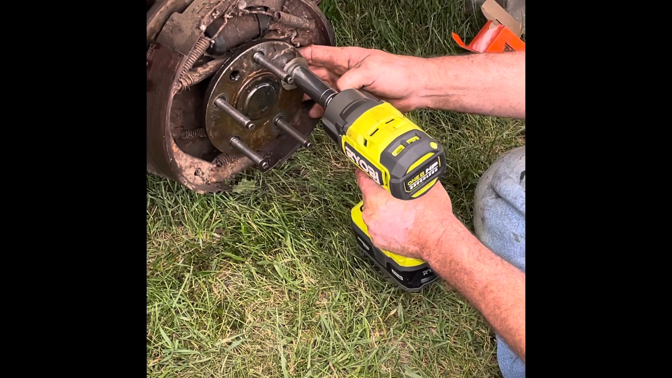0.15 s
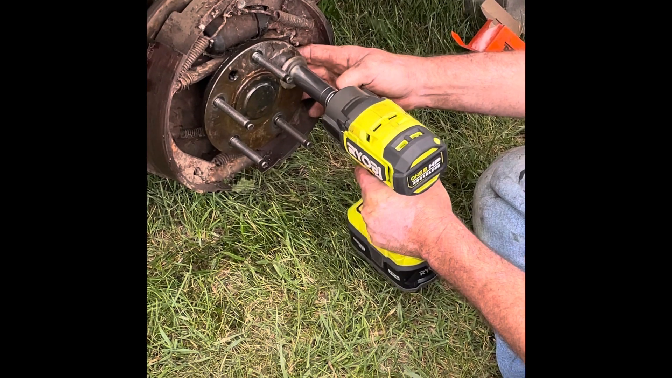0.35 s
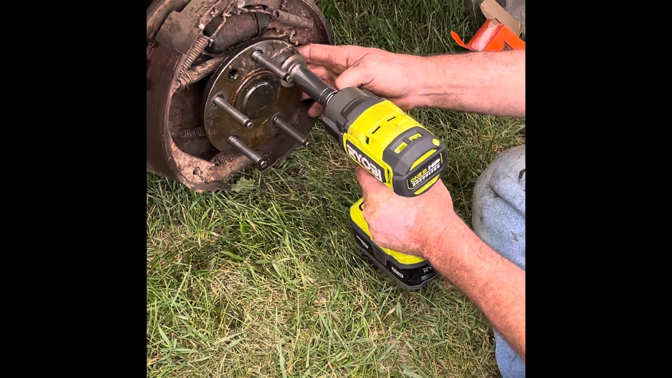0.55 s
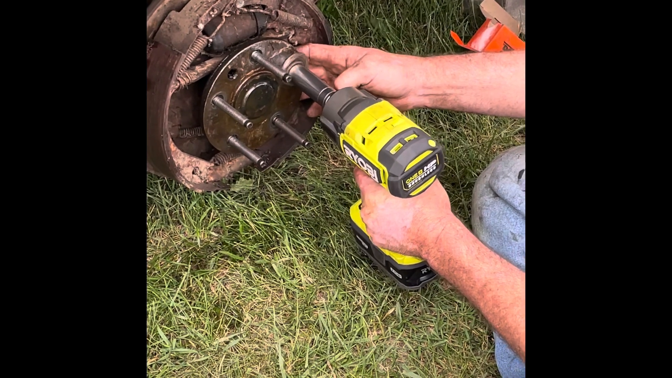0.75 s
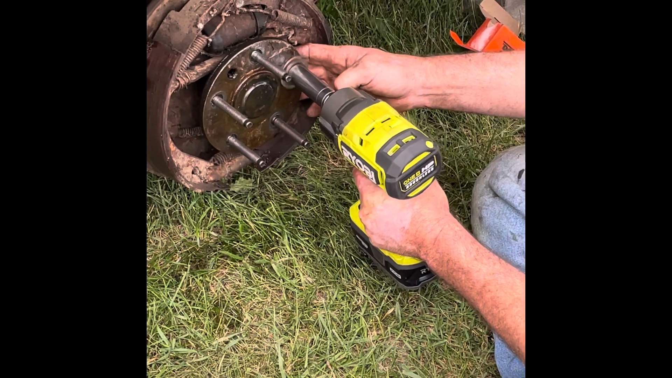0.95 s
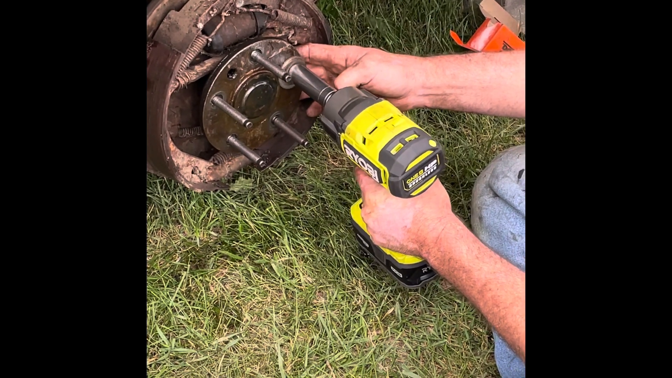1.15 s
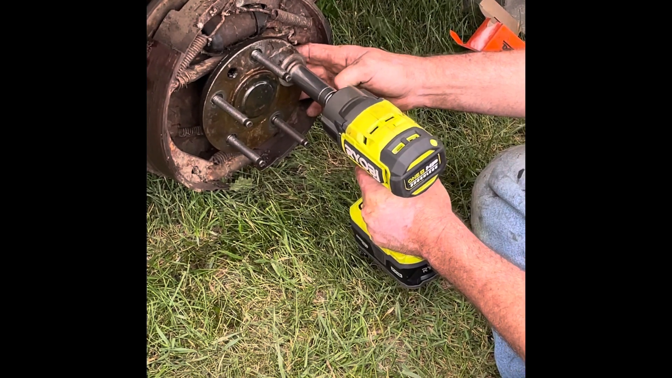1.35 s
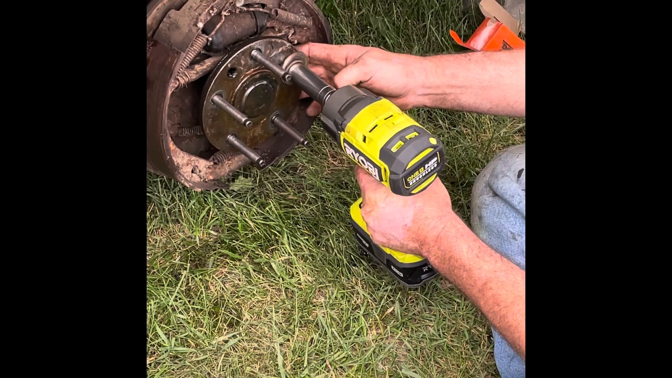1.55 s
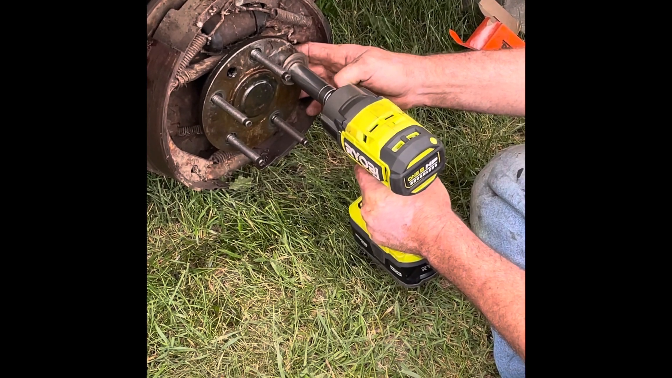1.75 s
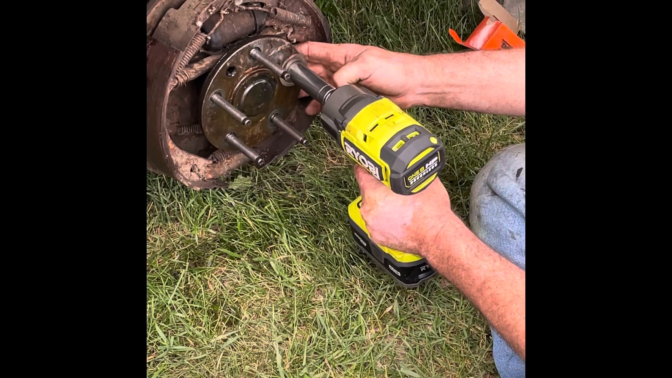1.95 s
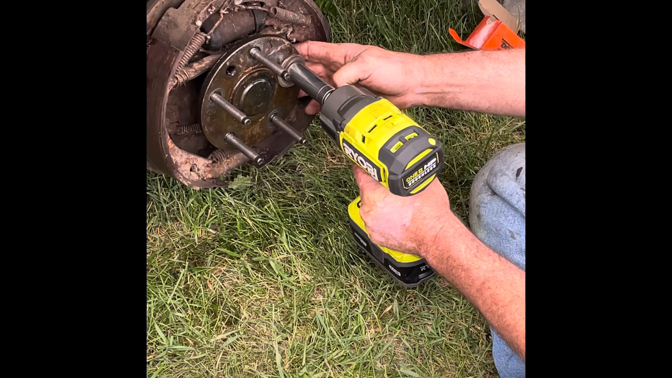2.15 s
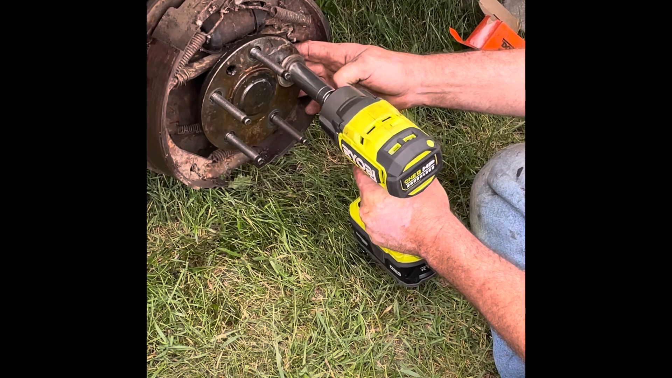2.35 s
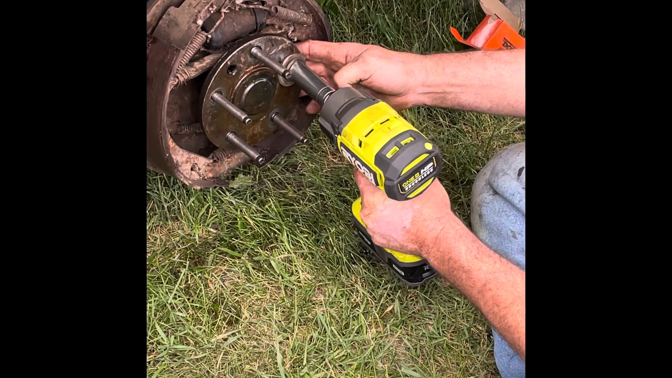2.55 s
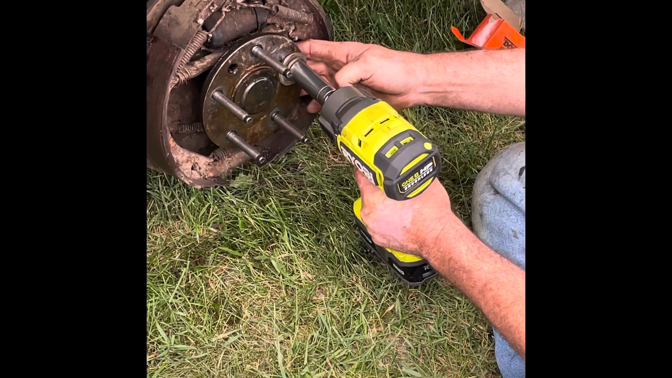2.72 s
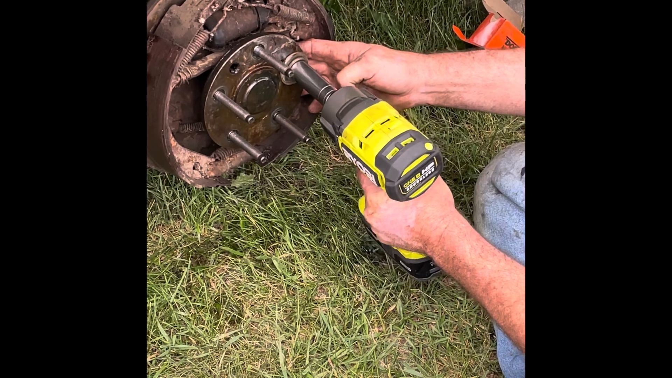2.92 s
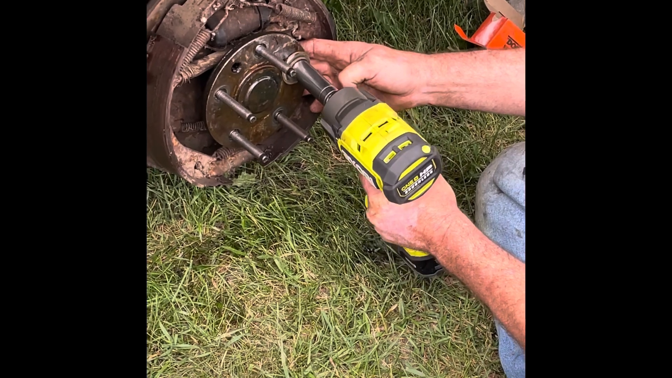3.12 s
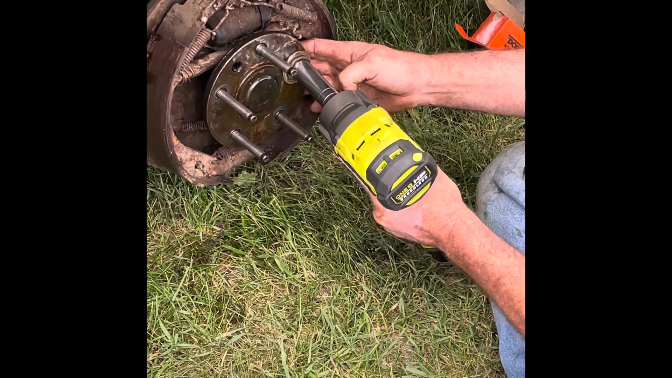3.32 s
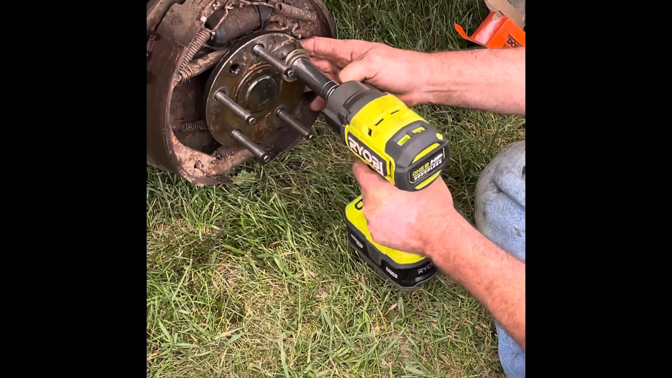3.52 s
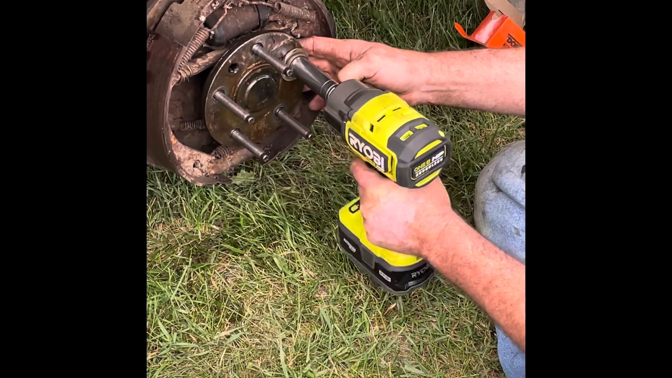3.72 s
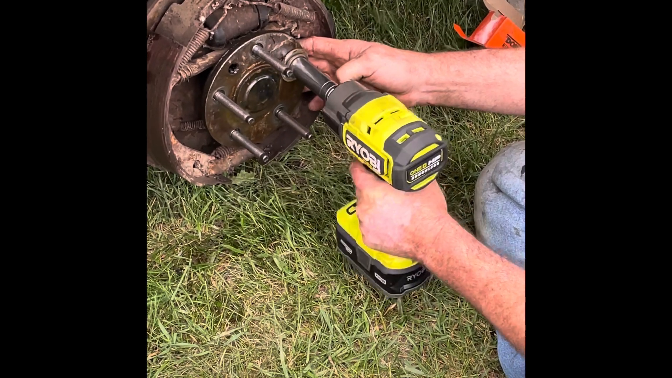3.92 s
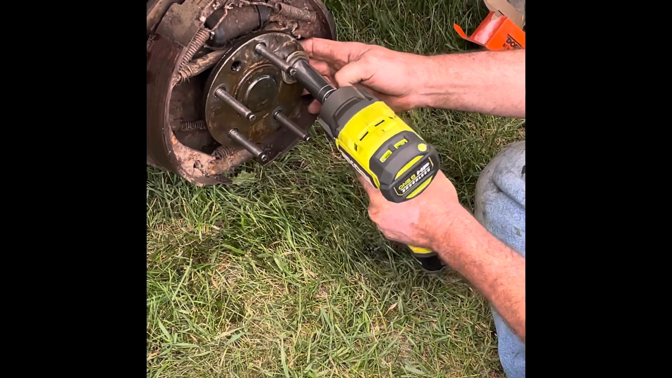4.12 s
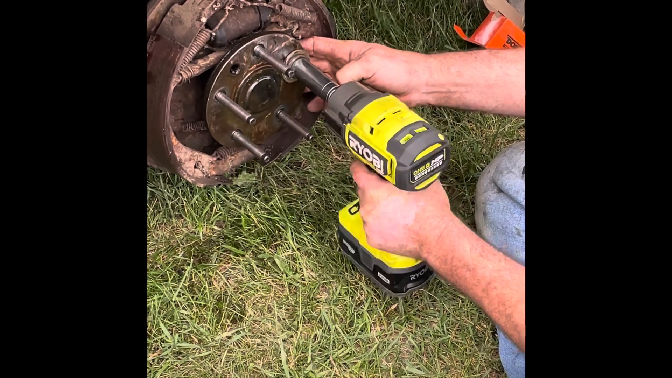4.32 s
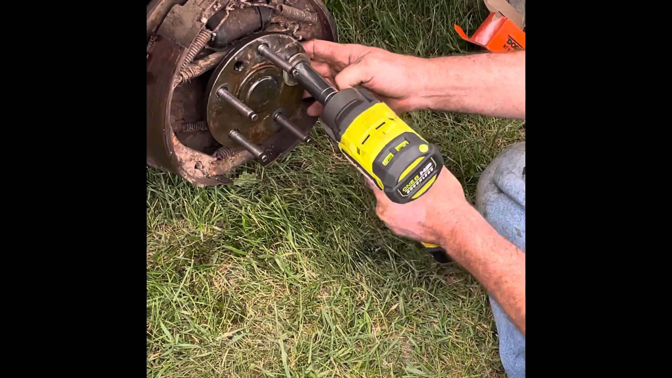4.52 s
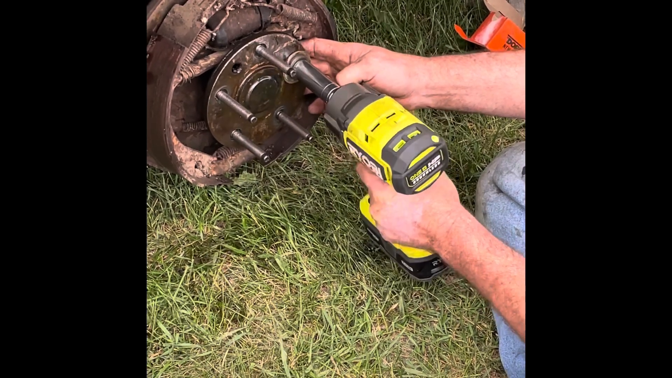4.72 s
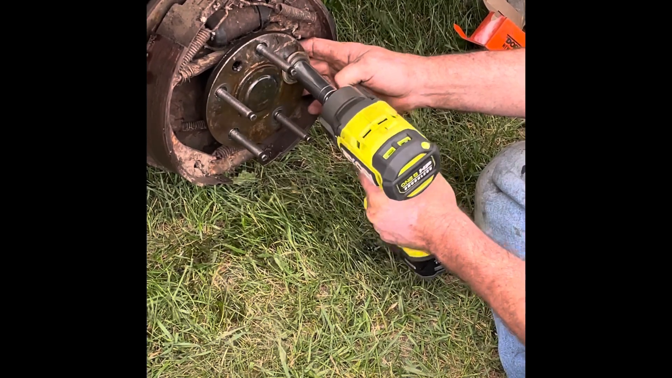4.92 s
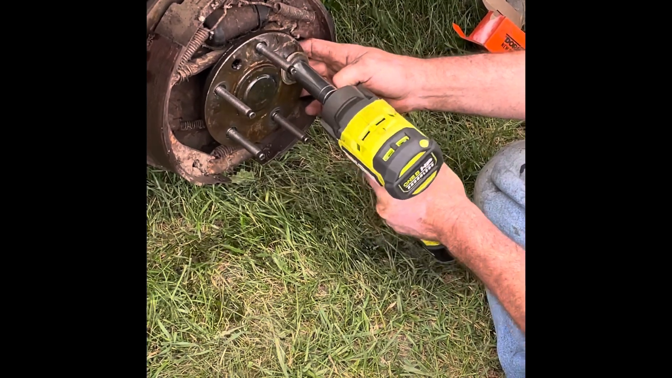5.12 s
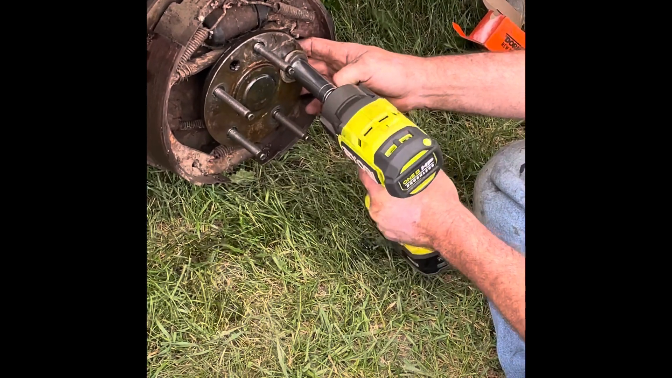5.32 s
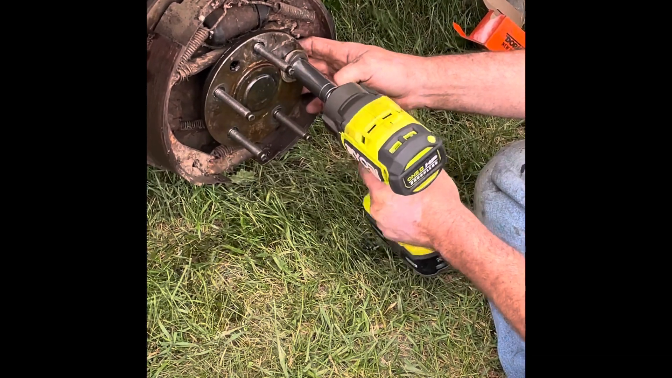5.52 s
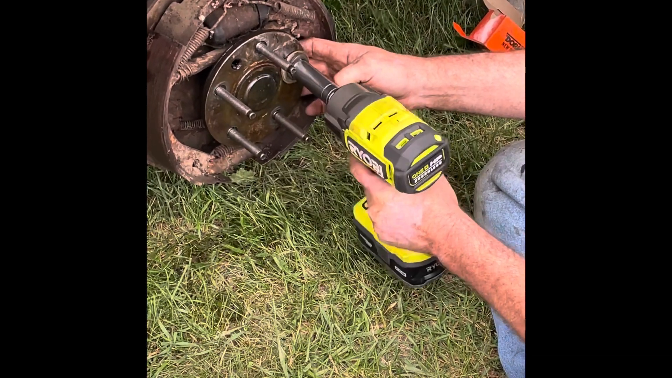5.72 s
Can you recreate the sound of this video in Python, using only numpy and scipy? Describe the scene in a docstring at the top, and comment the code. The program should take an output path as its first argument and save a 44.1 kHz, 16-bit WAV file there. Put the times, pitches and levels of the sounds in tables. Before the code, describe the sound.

Very close outdoors, a battery impact wrench is already hammering a nut on a wheel stud: a harsh buzzing clatter of about sixty steel blows a second, with ringing metal and gear rattle. It stops after three seconds. Four short bursts follow, separated by brief gaps with ticking socket and low wind buffeting; the last stumbles weakly. Dry open air, stereo microphone catching wind.

```python
"""A cordless impact wrench hammers a lug nut onto a wheel stud outdoors: one long burst, then four short ones.
Some sixty blows a second clash as decaying noise bands and ring the steel of stud, socket, anvil, nut and hub.
Gears rattle as flickering noise, the housing drones, axle and drum thud as low resonators; loose ticks come
before and after bursts. Wind rumbles, flutters and pops at two microphone ports over a faint far hiss."""
import sys
import numpy as np
from scipy import signal
from scipy.fft import rfft, irfft, next_fast_len
from scipy.io import wavfile

SR = 44100
rng = np.random.default_rng(int(sys.argv[2]) if len(sys.argv) > 2 else 0)


def master_out(mix):
    """Clip the mix to full scale and print it as 16-bit PCM to the path in sys.argv[1]."""
    frames = np.transpose(np.atleast_2d(mix))
    ceiling = np.clip(frames, -1, 1)
    pcm = np.round(ceiling * 32767).astype(np.int16)
    wavfile.write(sys.argv[1], SR, pcm)


N = 254368


def amp(db):
    """Decibels to amplitude."""
    return 10 ** (np.asarray(db) / 20)


def rms_one(x):
    """Scale to an rms of 1."""
    return x / np.sqrt(np.mean(x ** 2) + 1e-20)


def in_time(rows):
    """Columns of a curve table, interpolated to one value per sample."""
    time_s, *columns = np.transpose(rows)
    return [np.interp(np.arange(N) / SR, time_s, column) for column in columns]


def at_hz(points, hz):
    """Read a (frequency, value) curve, linear in log frequency."""
    points = np.array(points)
    return np.interp(np.log(hz), np.log(points[:, 0]), points[:, 1])


def samples(events):
    """Sample index of each event row."""
    return (np.array(events)[:, 0] * SR).astype(int)


def latest(at):
    """Index of the latest event at every sample; the first one before any."""
    return np.maximum(np.searchsorted(at, np.arange(N), "right") - 1, 0)


def drift(rate):
    """Slow random curve of spread about 1, with some 2 * rate knots a second."""
    knots = int(N / SR * rate * 2) + 2
    return np.interp(np.arange(N), np.linspace(0, N, knots), rng.standard_normal(knots))


def clicks(events, gains):
    """One-sample click of the given size at each event."""
    out = np.full(N, 1e-18)   # inaudible floor
    out[samples(events)] = gains
    return out


def fade(x, t60):
    """Each click jumps up and decays by 60 dB in t60 seconds."""
    return signal.lfilter([1], [1, -amp(-60 / (t60 * SR))], x)


def ring(x, hz, t60):
    """Two-pole resonator: a unit click starts a decaying sine of height about 1."""
    r, w = amp(-60 / (t60 * SR)), 2 * np.pi * hz / SR
    return signal.lfilter([0, np.sin(w)], [1, -2 * r * np.cos(w), r * r], x)


def glide(x, hz, t60):
    """Resonator whose pitch may move while it rings."""
    turn = np.exp(2j * np.pi * np.cumsum(hz * np.ones(N)) / SR)
    return np.imag(turn * fade(x / turn, t60))


def bandpass(x, low_hz, high_hz, order):
    """Butterworth band-pass."""
    return signal.sosfilt(signal.butter(order, [low_hz, high_hz], "band", fs=SR, output="sos"), x)


def bands(white):
    """Yield third-octave centre and noise, alternating two white noises so neighbours are unrelated."""
    edges_hz = 600 * 2 ** np.arange(0, 5.1, 1 / 3)
    for k, (low, high) in enumerate(zip(edges_hz, edges_hz[1:])):
        yield np.sqrt(low * high), bandpass(white[k % 2], low, high, order=2)


def hiss(spectrum, white, patchy_db, rate):
    """Band noise of rms 1 whose bands flicker partly together."""
    together = drift(rate)
    out = 0
    for hz, noise in bands(white):
        flicker_db = patchy_db * (together + 1.2 * drift(rate))
        out = out + amp(at_hz(spectrum, hz) + flicker_db) * noise
    return rms_one(out)


def hammer_blows():
    """Rows (s, dB): long burst at its pace, short bursts gathering speed, and blows out of step."""
    # pace of the long burst: (blows struck so far, time [s])
    pace = [(0, -.0027), (8, .128), (26, .4136), (44, .7044), (54, .8678), (78, 1.2501), (106, 1.693),
            (170, 2.6984), (176, 2.7918), (182, 2.8891), (186, 2.9514), (200, 3.1734)]
    # short bursts: (first blow [s], number of blows)
    bursts = [(3.924, 13), (4.3943, 12), (4.8959, 14)]
    # regular blows, two dogs in turn: (time [s], mean level of first 4 ms [dB], first dog above mean [dB])
    force = [(0, -16, 0), (.22, -17.5, -3), (.32, -18, 2), (.38, -15.5, 0), (.51, -21, 0), (.58, -18, 1.5),
             (.8, -17, -2), (1.03, -18.5, -1.5), (1.12, -16, -.5), (1.25, -19, 0), (1.54, -18.5, -1),
             (1.62, -16.5, -1.5), (1.76, -17.5, 1.5), (1.85, -18.5, 0), (2.16, -18.5, -1.5),
             (2.3, -19.5, 0), (2.38, -18.5, 1.5), (2.6, -17, 2.5), (2.73, -17, 1), (2.82, -20.5, 1.5),
             (3.01, -20, -3), (3.08, -18, -.5), (3.17, -18, -2), (3.92, -13, 0), (4.03, -15.5, -.7),
             (4.12, -12.5, 0), (4.58, -13.5, .5), (4.89, -19, 0), (4.92, -13, 0), (4.95, -12, 0),
             (4.98, -16.5, .5), (5.03, -15, .5), (5.08, -18, 0), (5.11, -13.5, 0)]
    # late blows as the motor slows, and the stumbling last burst: (time [s], level of first 4 ms [dB])
    strays = [(3.192, -15.5), (4.1428, -18.5), (4.6003, -18.5), (4.6185, -20.5), (5.129, -25),
              (5.3822, -22), (5.4093, -22), (5.4163, -18.5), (5.4368, -18.5), (5.4564, -25),
              (5.4742, -19.5), (5.4863, -23.5), (5.5156, -22.5), (5.5463, -22), (5.5649, -22),
              (5.5768, -21.5), (5.6107, -28), (5.6285, -25.5), (5.6479, -26)]
    start_gaps_s, gap_s = [.0213, .0183], .01597
    scatter_s, scatter_db = .0001, 1.1

    struck, struck_s = np.transpose(pace)
    times = [np.interp(np.arange(struck[-1] + 1), struck, struck_s)]
    for first_s, count in bursts:
        gaps_s = [0] + start_gaps_s + [gap_s] * (count - 3)
        times.append(first_s + np.cumsum(gaps_s))
    times = np.concatenate(times)

    luck = rng.standard_normal((len(times), 2))
    at_s, force_db, dog_db = np.transpose(force)
    level_db = np.interp(times, at_s, force_db)
    level_db = level_db + np.interp(times, at_s, dog_db) * (-1) ** np.arange(len(times))
    blow_s = np.maximum(times + scatter_s * luck[:, 0], 0)
    regular = np.transpose([blow_s, level_db + scatter_db * luck[:, 1]])
    rows = np.vstack([regular, strays])
    return rows[np.argsort(rows[:, 0])]


def habitual(blows, count):
    """White noise partly repeating at each dog's next blow, as it meets the same worn faces."""
    size, repeated, lasting = 900, .6, .9   # samples; energy share; pattern kept from turn to turn
    at = samples(blows)
    fresh = rng.standard_normal((count, len(at) + 40, size))
    # feedback two blows back: the same dog; 40 blows of run-in are dropped
    pattern = signal.lfilter([np.sqrt(1 - lasting ** 2)], [1, 0, -lasting], fresh, axis=1)[:, 40:]
    last = latest(at)
    since = np.arange(N) - at[last]
    share = repeated * ((since >= 0) & (since < size))
    chance = rng.standard_normal((count, N))
    return np.sqrt(share) * pattern[:, last, since % size] + np.sqrt(1 - share) * chance


def clash(events, white, colour_db, t60_scale, rise_s):
    """Faces meet in a spray of micro-contacts: noise leaps up and dies by band, coloured anew each time."""
    # relative noise density: (frequency [Hz], density [dB])
    clash_spectrum = [(700, -42), (950, -34), (1250, -22), (2000, -13), (3000, -2.5), (4200, -0.5),
                      (5600, -1.5), (7000, -3), (10000, -5), (13000, -11.5), (15500, -17)]
    # decay before t60_scale: (frequency [Hz], t60 [s])
    clash_decay = [(1000, 0.11), (2500, 0.026), (6000, 0.0082), (14000, 0.019)]
    out, luck = 0, rng.standard_normal((len(events), 15))
    level_db = np.array(events)[:, 1]
    for k, (hz, noise) in enumerate(bands(white)):
        struck = clicks(events, amp(level_db + colour_db * luck[:, k]))
        shape = fade(fade(struck, rise_s), t60_scale * at_hz(clash_decay, hz))
        shape = shape / (rise_s * SR / np.log(1000))
        out = out + amp(at_hz(clash_spectrum, hz)) * noise * shape
    return out


def steel_modes():
    """Pitch [Hz], level [dB] and t60 [s] of every steel mode as seating, load and grip change them."""
    # stud, two of the socket, anvil, nut, hub, before changes: (frequency [Hz], relative level [dB], t60 [s])
    seated_modes = [(3005, -23.5, 0.028), (4670, -21, 0.02), (4815, -17.5, 0.017), (3920, -18.5, 0.022),
                    (3600, -17, 0.008), (1398, -41, 0.16)]
    # other hub and anvil modes: (frequency [Hz], relative level [dB], t60 [s])
    other_modes = [(1572, -38, .07), (1728, -35, .06), (2357, -41, 0.07), (2690, -31, .03),
                   (6780, -24, 0.015), (8725, -38, .14), (10100, -29, 0.025)]
    # changes as the stud seats: (time [s], stud [dB], socket [dB], anvil [dB], nut [dB], hub [dB])
    seating = [(0, -11.5, 1, -3, -4, 0), (.25, -11, 0, 0, 5, -1), (.5, -11, -3, -5, -6, 0),
               (.65, -11, 0, 1, 1, 4), (.85, -9, 1, -4, 3, 0), (1.05, -9, 2, -1, 1, -2),
               (1.15, 10, 0, -2, 0, 0), (1.21, -4, -4, -4, -2, -1), (1.26, 10, -4, -5, 0, -1),
               (1.32, -3, -4, -6, -1, 1), (1.42, 0, -3, -7, -4, -2), (1.5, 8, 0, -9, -6, -3),
               (1.7, 7, 1, -2, -3, -1), (1.9, 4, 1, 4, -1, 2), (2.2, -3, 2, 2, -1, 0),
               (2.42, 5, -2, -2, 0, 2), (2.65, 1, -2, 1, 5, 0), (2.8, -3, -1, -4, -3, -2),
               (3.2, -6.5, 1, -8, -2, -9), (3.95, -4, 2, -6, 2, 2), (4.6, -4, 3, -2, 3, 0),
               (5.12, -2, 2, -2, 0, 0), (5.45, 5, 3, -6, -4, 0)]
    # pitch bend by load and grip: (time [s], stud [%], socket [%], hub [%])
    bending = [(.4, 0, .3, .6), (.56, 0, -2, .6), (.85, 0, 0, .6), (1.5, -1, -1.5, .6), (1.75, 0, 0, .6),
               (2.0, 0, -1.5, .6), (2.2, 0, -.5, .6), (2.4, 0, -2, .6), (3.2, 0, 0, .6), (3.93, 0, 1.5, 0),
               (5.12, 0, .5, -.8), (5.45, -6, 3, -.6)]

    stud_db, socket_db, *others_db = in_time(seating)
    change_db = [stud_db, socket_db, socket_db, *others_db] + [2.2 * drift(3.0) for mode in other_modes]
    stud, socket, hub = in_time(bending)
    socket = socket + .8 * drift(30)   # it sits loosely
    bend = [stud, socket, socket, 0, 0, hub] + [0] * len(other_modes)
    modes = []
    for (hz, level_db, t60), change, percent in zip(seated_modes + other_modes, change_db, bend):
        modes.append((hz * (1 + percent / 100), level_db + change, t60))
    return modes


def steel(blows, modes, spread_db, contact_s, clean):
    """Every blow drives every mode by a clean click and a short rough contact, each with its own strength."""
    out, luck = 0, rng.standard_normal((len(blows), len(modes)))
    rough = habitual(blows, count=1)[0] / np.sqrt(contact_s * SR / 14)   # longer contact, no more energy
    for k, (hz, level_db, t60) in enumerate(modes):
        struck = amp(level_db) * clicks(blows, amp(blows[:, 1] + spread_db * luck[:, k]))
        drive = clean * struck * (-1) ** k + .65 * rough * fade(struck, contact_s)
        out = out + glide(drive, hz, t60)
    return out


def with_force(x, events):
    """Force sets the level of the first 4 ms of each hit; chance only shares it among pitches."""
    at, length = samples(events), round(.004 * SR)
    energy = np.cumsum(np.append(0, x ** 2))
    rms = np.sqrt((energy[at + length] - energy[at]) / length)
    gain = amp(np.array(events)[:, 1]) / rms
    return x * gain[latest(at)]


def axle(blows, spread_db, wander_db, rate):
    """Pushes of one sign shake axle, drum and car corner: low lines at multiples of the blow rate, wavering."""
    # four axle modes and one of the drum, before shaking: (frequency [Hz], level [dB], t60 [s])
    low_modes = [(126, -37, .05), (176, -27.5, 0.019), (271.6, -27, 0.044), (309.2, -36.5, 0.047),
                 (630, -37, 0.028)]
    # the whole car corner rocks once per blow: frequency [Hz], level before shaking [dB], t60 [s]
    rocking = 63, -43.5, .1
    # change of level as the grip shifts: (time [s], axle [dB], drum [dB], rocking [dB])
    shaking = [(0, -6, -8, 0), (.2, -3, -10, 1), (.32, -9, -6, -12), (.42, -3, -9, 1), (.49, -12, -9, -20),
               (.56, -6, -8, -1), (.88, -8, -8, 0), (.99, -2, -8, -16), (1.09, -7, -9, 1),
               (1.16, -1, -6, -1), (1.21, -14, -9, -18), (1.31, -6, -9, -3), (1.8, 0, -9, -5),
               (1.9, -1, -6, -20), (1.96, -4, -7, -3), (2.15, -8, -8, -3), (2.6, -3, -6, -3),
               (2.76, -2, -7, -12), (2.89, -11, -9, -3), (3.2, -12, -8, -5), (4.6, -14, -8, -6),
               (4.9, -30, -16, -25), (5.2, -26, -13, -15), (5.42, -9, -1, -6), (5.5, -18, -1, -6),
               (5.55, -9, -3, -6), (5.65, -14, -3, -6)]
    push = clicks(blows, amp(spread_db * rng.standard_normal(len(blows))))
    axle_db, drum_db, rocking_db = in_time(shaking)
    grips_db = [axle_db] * (len(low_modes) - 1) + [drum_db, rocking_db]
    out = 0
    for k, ((hz, level_db, t60), grip_db) in enumerate(zip(low_modes + [rocking], grips_db)):
        gain = amp(grip_db + level_db + wander_db * drift(rate))
        out = out + ring(gain * push, hz, t60) * (-1) ** k
    return out


def running():
    """Loudness of motor and gears: spin up, hold, brake, then a faint coasting."""
    # trigger: (pressed [s], released [s], level at speed [dB], level at release [dB], braking [dB/s])
    pulls = [(-1, 3.195, -33, -34, 900), (3.86, 4.14, -30.5, -30.5, 350), (4.335, 4.61, -31, -33, 450),
             (4.835, 5.115, -32, -31, 1000), (5.345, 5.595, -33, -28, 420)]
    spin_up_s, spin_up_power = .06, 1.5   # loudness grows as a power of speed
    coast_below_db, coast_db_per_s = 25, 100
    t, out = np.arange(N) / SR, 0
    for pressed, released, start_db, end_db, braking in pulls:
        speed = np.clip((t - pressed) / spin_up_s, 0, 1)
        after = np.maximum(t - released, 0)
        dying_db = np.maximum(-braking * after, -coast_below_db - coast_db_per_s * after)
        held_db = np.interp(t, [pressed, released], [start_db, end_db])
        out = out + speed ** spin_up_power * amp(held_db + dying_db)
    return out


def gears(loudness, blows, modes, ring_db):
    """Rattle of the running gears, going round with the hammer, also keeps the steel ringing between blows."""
    # relative noise density: (frequency [Hz], density [dB])
    rattle_spectrum = [(700, -29), (950, -17), (1250, -1.5), (2500, 1.5), (4500, 4), (6000, -6),
                       (10000, -8), (15500, -11.5)]
    rattle = hiss(rattle_spectrum, habitual(blows, count=2), patchy_db=2, rate=60)
    rung = sum(glide(amp(level_db) * rattle, hz, t60) for hz, level_db, t60 in modes)
    return loudness * (rattle + amp(ring_db) * rms_one(rung))


def housing(loudness):
    """The plastic shell drones dully with the motor: wavering band noise."""
    drone = bandpass(rng.standard_normal(N), 470, 710, order=2)
    return amp(-22 + 2.5 * drift(30)) * loudness * rms_one(drone)   # -22 dB against the gears


def wind(apart):
    """Eddies passing the ports: lumpy rumble, higher flutter in gusts, soft pops; nearly alike at both."""
    # gusts: (time [s], relative rumble level [dB], relative flutter level [dB])
    gusts = [(0, -53, -54.5), (1.5, -55.5, -61), (3.2, -51, -54), (3.3, -49, -66), (3.36, -55, -72),
             (3.52, -51, -72), (3.8, -64, -70), (3.95, -52, -44), (4.15, -56, -46.5), (4.28, -56, -80),
             (4.35, -46, -48), (4.53, -41, -40), (4.64, -50, -36), (4.69, -47, -60), (4.8, -61.5, -88),
             (4.9, -66, -63.5), (5.1, -56, -65), (5.17, -50, -72), (5.33, -53, -85), (5.45, -58.5, -51),
             (5.62, -50, -52), (5.7, -48, -70), (5.76, -54, -72)]
    rumble_db, flutter_db = in_time(gusts)
    # rumble and flutter, each a mid and a weaker side noise
    white = rng.standard_normal((2, 2, N)) * [[1], [apart]]
    rumble = bandpass(white[0] * amp(4.7 * drift(25)), 40, 135, order=3)
    low = rms_one(bandpass(white[1] * amp(4.6 * drift(60)), 140, 340, order=3))
    high = rms_one(bandpass(white[1] * amp(4.6 * drift(60)), 340, 750, order=3))
    flutter = low + amp(.4 * np.minimum(flutter_db + 55, 8)) * high   # a weak flutter is also a dull one
    mid, side = amp(rumble_db) * rms_one(rumble) + amp(flutter_db - 2) * flutter
    return mid + wind_pops() + side * [[1], [-1]]


def wind_pops():
    """Single pops of wind: a short thump with a quieter knock on top, dulled."""
    # pops: (time [s], level before the low-pass [dB], pitch [Hz])
    pop_rows = [(3.2875, -27, 300), (3.295, -20, 70), (3.57, -39.5, 151), (3.689, -44, 250),
                (3.695, -40, 120), (3.713, -42, 250), (3.718, -32, 330), (3.724, -35, 170),
                (4.345, -30, 285), (4.387, -28, 580), (4.473, -17, 240), (4.501, -16, 330),
                (4.524, -15, 280), (4.536, -20, 170), (4.579, -21, 610), (4.599, -21, 560),
                (4.644, -24, 640), (4.689, -36, 400), (4.719, -34, 500)]
    out = 0
    for time_s, level_db, hz in pop_rows:
        thump = ring(clicks([(time_s, level_db)], amp(level_db)), hz, 3.0 / hz)
        knock = ring(clicks([(time_s, level_db)], amp(level_db - 22)), 620, .02)
        out = out + thump - knock
    return signal.sosfilt(signal.butter(4, 950, fs=SR, output="sos"), out)


def far_hiss():
    """Far outdoor hiss: faint noise with slowly flickering bands."""
    # relative noise density: (frequency [Hz], density [dB])
    air_spectrum = [(700, 14), (1500, 10), (4500, 9), (7000, -19)]
    return amp(-79.5) * hiss(air_spectrum, rng.standard_normal((2, N)), patchy_db=4, rate=20)


def socket_knocks():
    """Now and then the turning socket knocks: two short resonances."""
    # knocks: (time [s], click level [dB])
    knock_rows = [(0.723, -40), (1.14, -40), (1.452, -40), (1.896, -36), (2.129, -36), (2.364, -36),
                  (2.604, -38), (2.804, -40), (3.19, -42)]
    knocks = clicks(knock_rows, amp(np.array(knock_rows)[:, 1]))
    return ring(knocks, 655, .07) + .6 * ring(knocks, 545, .05)


def socket_ticks():
    """The loose socket ticks outside the bursts, as the motor coasts or spins up: short, weak clashes."""
    # ticks: (time [s], relative level [dB])
    tick_rows = [(3.399, -55), (3.4244, -38), (3.459, -59), (3.889, -28), (3.916, -14), (4.1753, -24),
                 (4.1897, -30), (4.2052, -26), (4.2201, -33), (4.2373, -28), (4.254, -31), (4.277, -40),
                 (4.3417, -32), (4.386, -16), (5.712, -46), (5.7232, -32)]
    white = rng.standard_normal((2, N))
    return amp(10.5) * clash(tick_rows, white, colour_db=2, t60_scale=.3, rise_s=.0036)


def ports(x):
    """Sound reaches the two ports with phase and level differences that depend on pitch."""
    # phase: (frequency [Hz], left leads by [rad])
    lead_points = [(700, .3), (2100, .15), (2600, .8), (4500, .7), (4900, 0), (5400, .2), (7200, 3.0),
                   (8000, 3.2), (11300, 6.3), (13800, 9.3), (15700, 10.2)]
    # balance: (frequency [Hz], left minus right [dB])
    balance = [(600, 0), (950, 5.5), (1400, 3), (2200, 0)]
    size = next_fast_len(N + 4096)
    hz = np.maximum(np.arange(size // 2 + 1) * SR / size, 1)
    lead_hz, lead_rad = np.transpose([(0, 0)] + list(lead_points))
    lead = np.interp(hz, lead_hz, lead_rad)
    half = amp(at_hz(balance, hz) / 2) * np.exp(.5j * lead)   # each port takes half the difference
    spectrum = rfft(x, size)
    return np.array([irfft(spectrum * h, size)[:N] for h in (half, 1 / half)])


def surroundings(x, echo_db):
    """Echoes off drum, wheel arch and ground, other ones at each port, weaker the later they come."""
    lags = (rng.uniform(.0005, .02, (2, 14)) * SR).astype(int)
    sides = []
    for side in lags:
        echoes = [amp(echo_db - 400 * lag / SR) * (-1) ** lag * np.pad(x, (lag, 0))[:N] for lag in side]
        sides.append(sum(echoes))
    return np.array(sides)


def scattered_clash(blows):
    """The part of each clash that reaches the ports unlike: noise of opposite sign at each."""
    white = rng.standard_normal((2, N))
    unlike = with_force(clash(blows, white, colour_db=1, t60_scale=1.1, rise_s=.003), blows)
    return amp(-13.5) * unlike * [[1], [-1]]


def scene():
    """Tool close by, wind and far hiss."""
    blows = hammer_blows()
    modes = steel_modes()
    loudness = running()
    hammer = clash(blows, habitual(blows, count=2), colour_db=1.8, t60_scale=.98, rise_s=.0031)
    hammer = hammer + steel(blows, modes, spread_db=2.5, contact_s=.01, clean=1.3)
    tool = with_force(hammer, blows) + socket_ticks() + gears(loudness, blows, modes, ring_db=-8)
    # small parts radiate no lows
    tool = signal.sosfilt(signal.butter(2, 900, "high", fs=SR, output="sos"), tool)
    thuds = axle(blows, spread_db=1.8, wander_db=2.5, rate=10) + socket_knocks()
    shared_air, *port_air = [far_hiss() for _ in range(3)]
    near = ports(tool + thuds + housing(loudness) + shared_air)
    near = near + surroundings(tool, echo_db=-17) + scattered_clash(blows)
    return near + .6 * np.array(port_air) + wind(apart=.14)


def record(dry):
    """Lows under some 40 Hz fall away, peaks are rounded, the top is cut."""
    dry = signal.sosfilt(signal.butter(2, 42, "high", fs=SR, output="sos"), dry)
    cutoff_hz = 16400   # 80 dB down from here up
    return signal.sosfilt(signal.cheby2(18, 80, cutoff_hz, fs=SR, output="sos"), np.tanh(dry))


dry = scene()
out = record(dry)
master_out(out)
```